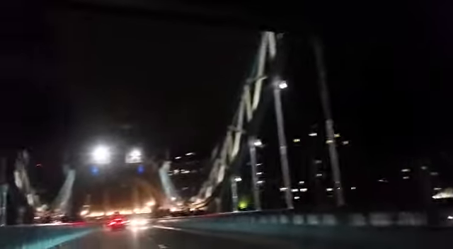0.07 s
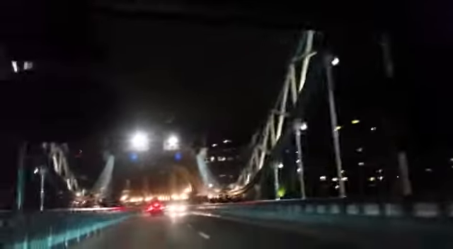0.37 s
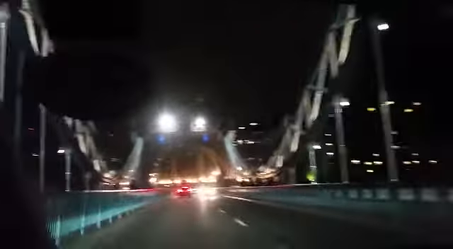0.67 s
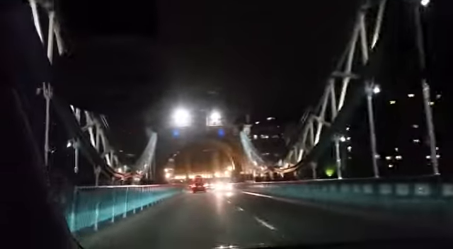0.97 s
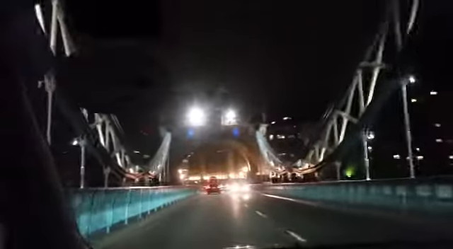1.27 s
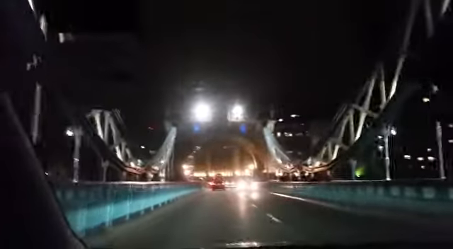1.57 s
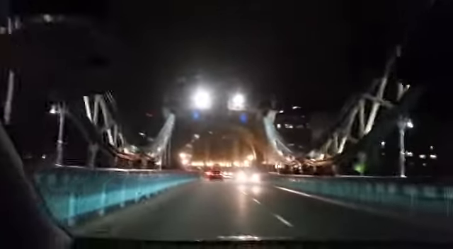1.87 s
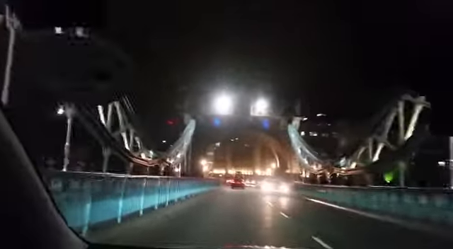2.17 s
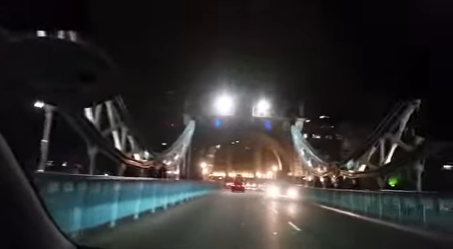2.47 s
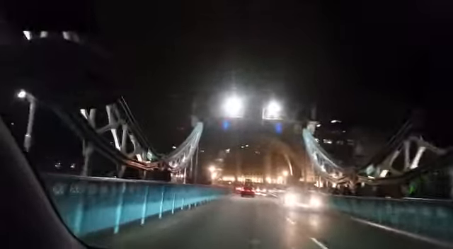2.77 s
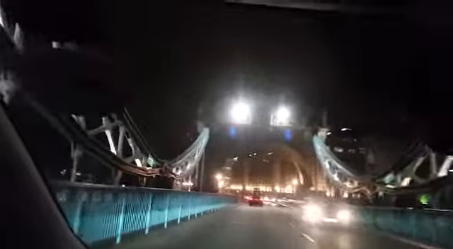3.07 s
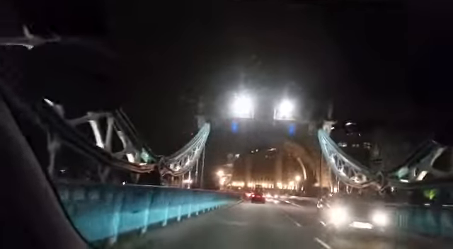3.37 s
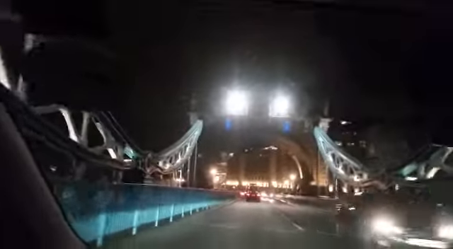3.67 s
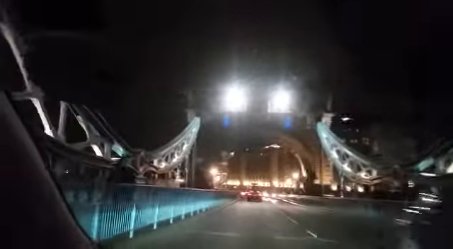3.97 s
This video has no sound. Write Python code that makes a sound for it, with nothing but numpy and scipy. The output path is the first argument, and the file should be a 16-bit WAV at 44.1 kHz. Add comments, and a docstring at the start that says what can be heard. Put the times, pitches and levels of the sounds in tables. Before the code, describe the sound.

Low road rumble inside a moving car, with a few booming bumps early on.

```python
"""Tyre roar inside a car rolling over a bridge, with body resonances and a faint engine drone.
Bumps in the deck, three strong and two weak, shudder the wheels and make the cabin boom.
The trim ticks and something rustles softly on the right. The microphones add a thin high hiss,
mostly on the left, where one tiny click also sounds."""
import sys
import numpy as np
from scipy import signal
from scipy.fft import rfft, irfft
from scipy.io import wavfile

SR = 44100
rng = np.random.default_rng(int(sys.argv[2]) if len(sys.argv) > 2 else 0)


def materialize(psi):
    """Save the field psi as 16-bit PCM at rate SR to the path in sys.argv[1].

    A 1-D psi becomes a single channel; in a 2-D psi each row is a channel.
    """
    bounded = np.clip(np.atleast_2d(psi).T, -1, 1)
    quanta = np.round(bounded * 32767).astype(np.int16)
    wavfile.write(sys.argv[1], SR, quanta)


N = 176400


def undb(db):
    """Decibels to gain."""
    return 10 ** (np.asarray(db) / 20)


def unit(x):
    """Scale to rms 1."""
    return x / np.sqrt(np.mean(x ** 2))


def times():
    """Sample times in s."""
    return np.arange(N) / SR


def freqs():
    """Bin frequencies in Hz, floored at 1."""
    return np.maximum(np.arange(N // 2 + 1) * SR / N, 1)


def curve(points):
    """Gain over time from (t/s, level/dB) points."""
    return undb(np.interp(times(), *np.array(points).T))


def colour(x, points):
    """Filter by (f/Hz, gain/dB) points."""
    hz, db = np.array(points).T
    gain = undb(np.interp(np.log(freqs()), np.log(hz), db))
    return irfft(rfft(x) * gain, N)


def resonance(hz, width_hz):
    """Steep-sided resonance driven by noise, rms 1."""
    f = freqs()
    detuning = (f * f - hz * hz) / (f * width_hz * np.sqrt(2))
    return unit(irfft(rfft(rng.standard_normal(N)) / (1 + 1j * detuning) ** 2, N))


def walk(rate_hz):
    """Smooth random drift up to about rate_hz, rms 1."""
    return unit(irfft(rfft(rng.standard_normal(N)) * np.exp(-(freqs() / rate_hz) ** 2), N))


def wavering(hz, wander, rate_hz):
    """Tone of rms 1; its pitch drifts by the rms fraction wander."""
    start_cycles = rng.random()
    pitch_hz = hz * (1 + wander * walk(rate_hz))
    return np.sqrt(2) * np.sin(2 * np.pi * (start_cycles + np.cumsum(pitch_hz) / SR))


def swell(peak_s, sigma_s):
    """Gaussian envelope."""
    return np.exp(-.5 * ((times() - peak_s) / sigma_s) ** 2)


def burst(at_s, rise_s, decay_s):
    """Envelope: linear rise, exponential fall."""
    age_s = np.maximum(times() - at_s, 0)
    return np.minimum(age_s / rise_s, 1) * np.exp(-np.maximum(age_s - rise_s, 0) / decay_s)


def pan(x, db):
    """Place by level difference, left minus right."""
    return x * undb(np.array([[db], [-db]]) / 2)


def hiss():
    """Steady self-noise of the two microphones."""
    # noise spectra: f/Hz, relative density/dB
    left_spectrum = [(4000, -39), (8600, -36), (9900, -15.5), (10900, -10), (11900, 0), (12700, 1),
                     (13000, -3.5), (13500, -4), (14000, -12.5), (15000, -10), (16000, -18)]
    right_spectrum = [(4000, -24), (9000, -17.5), (10800, -1), (12000, -2.5), (13500, 1.5), (14100, -4),
                      (16000, -1)]
    left, right = rng.standard_normal((2, N))
    return np.array([undb(-51.5) * unit(colour(left, left_spectrum)),
                     undb(-63.5) * unit(colour(right, right_spectrum))])


def click():
    """One very short, very high click on the left."""
    envelope = undb(-35.5) * swell(peak_s=.7641, sigma_s=.0004)
    return pan(envelope * resonance(hz=12800, width_hz=2100), db=16)


def rustle():
    """Soft grainy swish on the right, like cloth sliding."""
    # swish envelope: t/s, level/dB
    envelope = [(1.55, -79), (1.67, -51.5), (1.79, -50.5), (1.9, -42.5), (1.95, -47), (2.02, -43),
                (2.11, -48), (2.18, -47.5), (2.3, -55.5), (2.6, -67.5)]
    # swish spectrum: f/Hz, relative density/dB
    spectrum = [(300, -13.5), (600, -4.5), (690, 0.5), (780, -9.5), (920, 7.5), (1050, -1), (1400, -7),
                (1700, -0.5), (2120, 0.5), (2300, -3.5), (2900, -10.5), (3550, -9.5), (4300, -12.5),
                (5000, -18.5), (6200, -18.5), (8300, -35.5), (12000, -30), (16000, -34)]
    rub = unit(colour(rng.standard_normal((2, N)), spectrum))
    grain_db = 1.5 * walk(rate_hz=90)
    return pan(rub * curve(envelope) * undb(grain_db), db=-9.5)


def ticks():
    """Plastic trim ticks as the body flexes; upholstery dulls it."""
    # trim ticks: t/s, level before damping/dB, f/Hz, decay/s, pan/dB
    events = [(.432, -41, 2100, 0.0065, -4.5), (.535, -53, 2600, 0.11, -4), (0.829, -39, 1800, .008, -11),
              (1.185, -47.5, 3400, 0.0095, -8.5), (2.349, -48, 2000, .008, -5),
              (3.532, -48, 1700, 0.0051, -2), (3.812, -54.5, 5800, .01, -7)]
    # upholstery damping: f/Hz, gain/dB
    damping = [(2000, -0.5), (4500, -4), (6000, -5), (8000, -16.5)]
    out = 0
    for at_s, db, hz, decay_s, pan_db in events:
        noise = np.array([resonance(hz, width_hz=.8 * hz) for _ in range(2)])
        envelope = undb(db) * burst(at_s, rise_s=.002, decay_s=decay_s)
        out += pan(envelope * noise, pan_db)
    return colour(out, damping)


def panels():
    """Panels and glass ring faintly in the roar; some slowly swell or fade."""
    # panel modes: f/Hz, width/Hz, initial level/dB, pan/dB, slope/(dB/s)
    modes = [(475.7, 25, -53, 6.5, 0), (674, 30, -57, -3.5, .5), (805, 34, -51.5, 2, -2),
             (1649, 54, -62.5, -6, -0.16), (3527, 45, -81.5, -8, 0)]
    return sum(pan(undb(db + db_per_s * times()) * resonance(hz, width_hz), pan_db)
               for hz, width_hz, db, pan_db, db_per_s in modes)


def drone():
    """Faint unsteady tones of engine and tread at constant speed."""
    # drone tones: f/Hz, level/dB
    tones = [(108, -37), (362, -41), (379, -46.5)]
    out = 0
    for hz, db in tones:
        flutter_db = .5 * walk(rate_hz=18)
        out += undb(db + flutter_db) * wavering(hz, wander=.01218, rate_hz=8.05)
    return out


def body():
    """The rough deck shakes the resonances of cabin and tyres."""
    # deck roughness: t/s, gain/dB
    roughness = [(0, 6.5), (.25, 4.5), (.6, 4), (1.0, 0.5), (1.2, 4.5), (1.5, 3.5), (1.7, 0), (2.1, 1.5),
                 (2.6, -1), (3.2, 1), (3.55, 0), (3.7, 2), (4, -0.5)]
    # body and tyre modes: f/Hz, width/Hz, base level/dB
    modes = [(31, 10, -40), (49, 8.3, -31.5), (87.5, 5.2, -32.5), (112.4, 25.7, -25.5),
             (152.8, 29.6, -27.5), (235.3, 9.4, -44.5), (268.9, 18, -42), (319, 23, -49)]
    return curve(roughness) * sum(undb(db) * resonance(hz, width_hz) for hz, width_hz, db in modes)


def bumps():
    """Each bump shudders the wheels at a sinking pitch; the cabin's lowest mode then swells and dies."""
    # deck bumps: shudder peak t/s, f/Hz, level/dB; boom delay/s, f/Hz, level/dB, sigma/s
    events = [(0.448, 101, -14, 0.052, 44, -9.5, 0.028), (.82, 94.76, -11.5, 0.097, 46, -10.5, 0.099),
              (1.199, 107.9, -18, 0.054, 48, -13, 0.077), (1.551, 100, -31, 0.097, 47, -17, 0.032),
              (1.991, 100, -31, 0.047, 49, -19.5, .045)]
    shudder_sigma_s, sag_per_s, wander = .073, 1.6, .077
    out = 0
    for at_s, shudder_hz, shudder_db, delay_s, boom_hz, boom_db, boom_sigma_s in events:
        from_peak_s = np.clip(times() - at_s, -2 * shudder_sigma_s, 2 * shudder_sigma_s)
        sinking_hz = shudder_hz * np.exp(-sag_per_s * from_peak_s)
        shudder = wavering(sinking_hz, wander, rate_hz=41) * swell(at_s, shudder_sigma_s)
        boom = wavering(boom_hz, wander, rate_hz=20) * swell(at_s + delay_s, boom_sigma_s)
        out += undb(shudder_db) * shudder + undb(boom_db) * boom
    return out


def tyre_roar():
    """Tyre roar through the floor: coherent between the ears in the bass, diffuse in the treble."""
    # roar spectrum at each ear: f/Hz, relative density/dB
    left_spectrum = [(20, -48.5), (32, -35), (68, -44.5), (190, -41), (280, -42), (380, -44), (440, -51.5),
                     (560, -56), (820, -57.5), (1150, -60.5), (1650, -66.5), (2500, -76.5), (3400, -84),
                     (3950, -76.5), (5000, -97), (6900, -96), (8500, -108), (16000, -115)]
    right_spectrum = [(20, -46.5), (32, -29), (68, -39.5), (190, -38), (280, -40), (380, -41), (440, -49.5),
                      (560, -52.5), (820, -57.5), (1150, -59.5), (1650, -63), (2500, -73), (3000, -79.5),
                      (3700, -77), (5000, -87.5), (6900, -94), (8500, -108), (16000, -115)]
    # roar envelope: t/s, gain/dB
    envelope = [(0, 0), (.6, 0.5), (1.2, 0.5), (2.2, 2.5), (3.2, 1.5), (4, 4.1)]
    base_db, diffuse_above_hz = -30.5, 780
    coherence = 1 / (1 + (freqs() / diffuse_above_hz) ** 1.9)
    mid_bins, side_bins = rfft(rng.standard_normal((2, N)))
    mid = irfft(mid_bins * np.sqrt(1 + coherence), N)
    side = irfft(side_bins * np.sqrt(1 - coherence), N)
    ears = np.array([colour(mid + side, left_spectrum), colour(mid - side, right_spectrum)])
    flicker_db = .67 * walk(rate_hz=22)
    return unit(ears) * curve(envelope) * undb(base_db + flicker_db)


def scene():
    """Stereo mix at the front seat."""
    roar = tyre_roar() + panels()
    bass = pan(body() + drone() + bumps(), db=-1.3)
    return roar + bass + ticks() + click() + rustle() + hiss()


def record(dry):
    """Steep zero-phase low-pass on the top treble."""
    cutoff_hz = 15750
    return signal.sosfiltfilt(signal.ellip(8, .05, 60, cutoff_hz, fs=SR, output="sos"), dry)


dry = scene()
out = record(dry)
materialize(out)
```